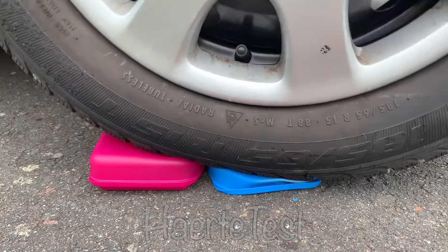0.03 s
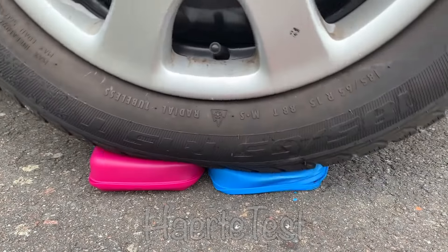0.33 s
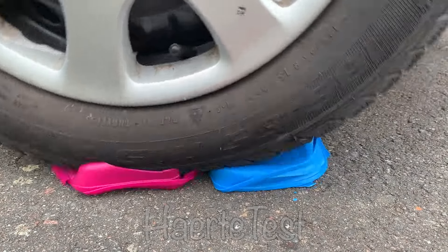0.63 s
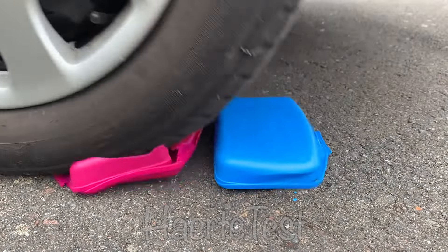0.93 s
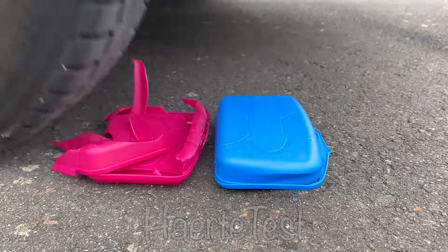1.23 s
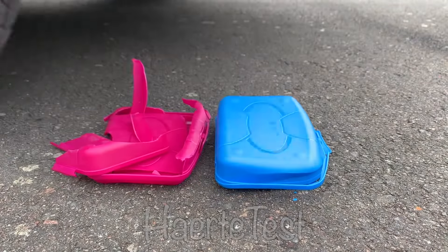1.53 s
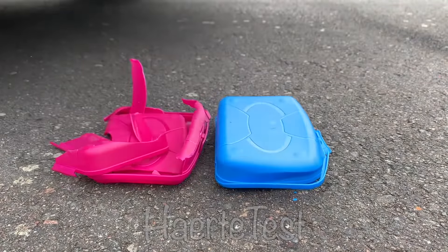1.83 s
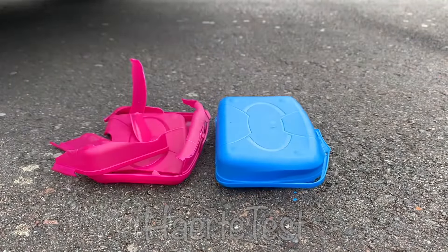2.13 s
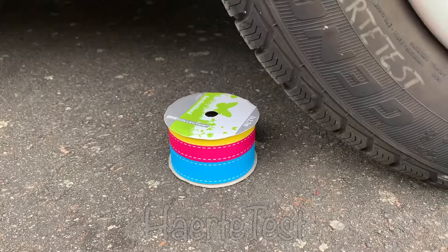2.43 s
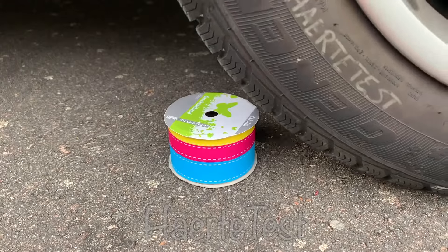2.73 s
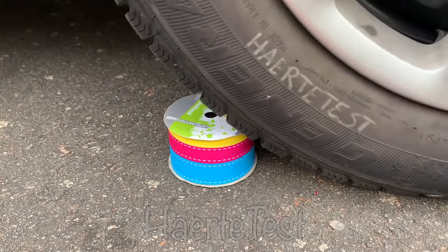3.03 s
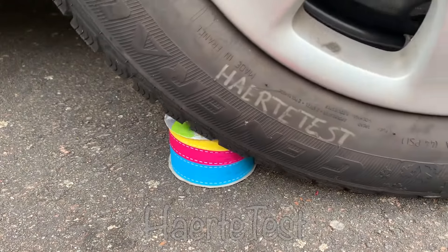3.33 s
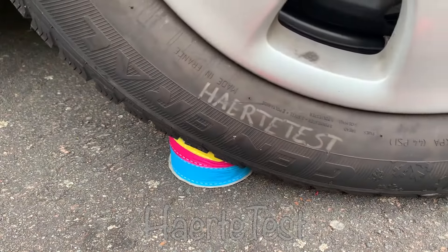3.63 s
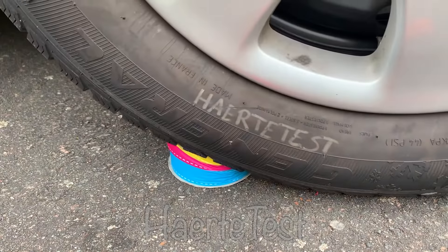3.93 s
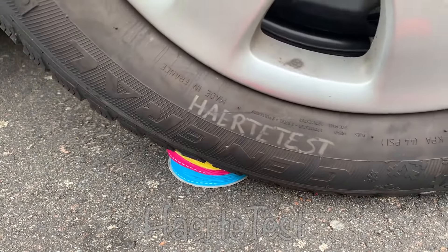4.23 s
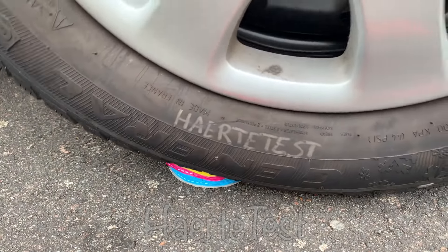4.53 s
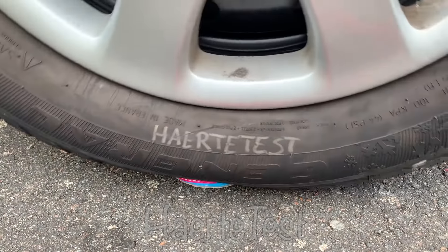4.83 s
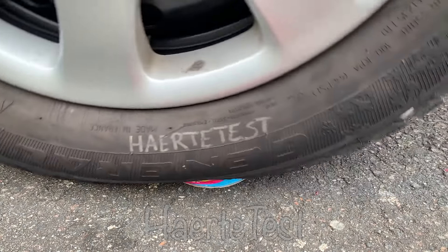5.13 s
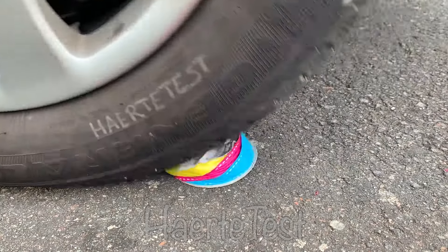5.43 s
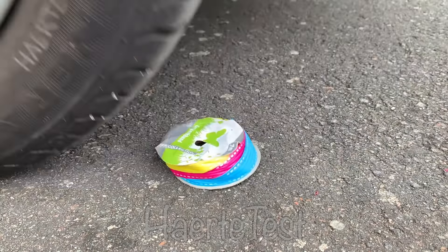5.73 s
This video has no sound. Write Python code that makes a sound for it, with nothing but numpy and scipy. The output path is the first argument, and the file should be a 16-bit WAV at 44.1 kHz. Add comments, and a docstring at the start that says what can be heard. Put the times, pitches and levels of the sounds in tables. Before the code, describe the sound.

A car tyre rolls over plastic boxes with sharp cracks, then slowly crunches a spool over a low engine rumble.

```python
"""Car crushing plastic on asphalt.

A car creeps over two lunch boxes: the shells crack, crunch and spring back over the engine's throb,
with a short echo from the gap between road and underbody. After a cut the car is nearer: its tyre
slowly squashes a ribbon spool and pops grit while the engine labours, then revs to climb over."""
import sys
import numpy as np
from scipy import signal
from scipy.fft import rfft, irfft, next_fast_len
from scipy.io import wavfile
from scipy.ndimage import uniform_filter1d, map_coordinates

SR = 44100
rng = np.random.default_rng(int(sys.argv[2]) if len(sys.argv) > 2 else 0)


def wav_out(sig):
    """Save sig, one row per channel (or a flat mono array), as 16-bit PCM at SR to the path in sys.argv[1]."""
    wavfile.write(sys.argv[1], SR, np.round(np.clip(np.atleast_2d(sig).T, -1, 1) * 32767).astype(np.int16))


N = 259308

# spells of crumpling: (peak time [s], level [dB], rise [s], fall [s])
BOX_CRUSH = [(.47, -64.5, 0.25, 0.13), (.523, -26.5, 0.016, 0.022), (.66, -37.5, 0.045, 0.07),
             (.81, -43.5, .02, 0.1), (.942, -39.5, 0.047, .075), (1.095, -40.5, 0.069, 0.085),
             (1.222, -51.5, 0.053, 0.057)]
SPOOL_CRUSH = [(3.29, -60, 0.52, 0.18), (3.56, -49, .4, 0.35), (4.26, -58, 0.11, 0.17),
               (5.45, -63, 1.4, .4)]
# road grit: (frequency [Hz], density [dB])
GRIT_SPECTRUM = [(1500, -23), (2800, -1.5), (4400, -4), (6100, 4.5), (7200, -4.5), (8400, -1), (10500, -6),
                 (12000, -13), (13500, -7.5), (15500, -25)]


def amp(db):
    """Decibels to gain."""
    return 10 ** (np.asarray(db) / 20)


def unit(x):
    """Scale to rms 1."""
    return x / np.sqrt(np.mean(x ** 2) + 1e-20)


def steady(x):
    """Hold the slow level at rms 1; keep the throb."""
    power = uniform_filter1d(uniform_filter1d(x ** 2, size=SR // 7), size=SR // 10)
    return x / np.sqrt(np.abs(power) + 1e-20)


def along(points, hz):
    """Interpolate (Hz, value) points on a log axis."""
    f, v = np.transpose(points)
    return np.interp(np.log(hz + 1), np.log(f + 1), v)


def curve(points):
    """Interpolate (s, value) points per sample."""
    return np.interp(np.arange(N) / SR, *np.transpose(points))


def fade(t, t60):
    """Decay by 60 dB in t60."""
    return np.exp(-np.log(1000) * t / t60)


def swells(rows):
    """Summed gain; each swell gains 20 dB per rise time, then loses 20 dB per fall time."""
    t = np.arange(N) / SR
    return sum(amp(db - 20 * np.maximum((s - t) / rise, (t - s) / fall)) for s, db, rise, fall in rows)


def wobble(rate_hz):
    """Smooth random curve."""
    knots = rng.standard_normal(int(N * rate_hz / SR) + 4)
    return map_coordinates(knots, [np.arange(N) * rate_hz / SR])


def filtered(x, response):
    """Apply a complex frequency response."""
    size = next_fast_len(N + SR // 2)
    return irfft(rfft(x, size) * response(np.fft.rfftfreq(size, 1 / SR)), size)[..., :N]


def coloured(x, spectrum):
    """Shape by (Hz, dB) points; rms 1."""
    return unit(filtered(x, lambda hz: amp(along(spectrum, hz))))


def resonate(x, modes, soft_hz):
    """Resonances (Hz, width Hz, dB), low-passed at soft_hz."""
    def response(f):
        bank = sum(amp(db) * 1j * f * w / (c * c - f * f + 1j * f * w) for c, w, db in modes)
        return bank / (1 + np.sqrt(2) * 1j * f / soft_hz - (f / soft_hz) ** 2) ** 2
    return filtered(x, response)


def ring(modes, t, shift, blur):
    """Damped modes (Hz, dB, t60 s); bending shifts them, rubbing edges blur them."""
    scatter = rng.standard_normal((len(modes), 2))
    rattle = blur * np.cumsum(rng.standard_normal((len(modes), len(t))), axis=1)
    return sum(amp(db + a) * fade(t, t60) * np.sin(2 * np.pi * hz * (1 + shift * b) * t + phase)
               for (hz, db, t60), (a, b), phase in zip(modes, scatter, rattle))


def stereo(x, lag_ms):
    """Left and right; right is lag_ms later."""
    return filtered(x, lambda hz: np.exp(1j * np.pi * hz * lag_ms / 1000 * np.array([[1], [-1]])))


def rush(spectrum, lag_ms, diffuse, patchy_db):
    """Stereo noise, part direct, part diffuse; its colour shifts in narrow patches."""
    direct = stereo(rng.standard_normal(N), lag_ms)
    pair = np.sqrt(1 - diffuse) * direct + np.sqrt(diffuse) * rng.standard_normal((2, N))
    bins = signal.stft(pair, nperseg=1024)[2]
    patches = uniform_filter1d(rng.standard_normal(bins.shape[1:]), size=3, axis=0)
    patches = unit(uniform_filter1d(patches, size=16, axis=1))
    return coloured(signal.istft(bins * amp(patchy_db * patches), nperseg=1024)[1][:, :N], spectrum)


def echo(x, decay):
    """Diffuse stereo tail with a t60 per frequency."""
    hz, t, bins = signal.stft(rng.standard_normal((2, SR // 2)), SR, nperseg=256)
    tail = signal.istft(bins * fade(t, along(decay, hz)[:, None]), SR, nperseg=256)[1]
    return signal.fftconvolve(x[None], tail / np.linalg.norm(tail[0]), axes=1)[:, :N]


def exhaust_hum(rows, rate_hz, cycles):
    """Under held throttle, the firing harmonic nearest each pitch sings out."""
    fall_s = .14  # per 20 dB
    t = np.arange(N) / SR
    out = np.zeros(N)
    for start, end, hz, db in rows:
        harmonic = np.round(hz / np.interp((start + end) / 2, t, rate_hz))
        outside_s = np.maximum(0, np.maximum(start - t, t - end))
        out += amp(db - 20 * outside_s / fall_s) * np.sqrt(2) * np.cos(2 * np.pi * harmonic * cycles - 1)
    return out * amp(wobble(7))


def engine(speed, load, lug, hum, layers, pipe, bay, first_firing_s, boom_mode, drone_mode,
           pipe_db, puff_db):
    """Each firing kicks the exhaust resonances and lets out a puff; the engine bay whirrs."""
    gas = [(100, -15), (220, -3), (330, -4), (460, -7.5), (580, -3), (850, -7), (1200, -14.5), (3000, -65)]  # exhaust gas: (frequency [Hz], density [dB])
    creep_hz, uneven_db, jitter_cycles = 22.9, 1.6, .013
    rate_hz, load_db = curve(speed), curve(load)
    shake_db, boom_db, drone_db, rasp_db, whirr_db = [
        db + by_speed * (rate_hz - creep_hz) + by_load * load_db for db, by_speed, by_load in layers]
    cycles = np.cumsum(rate_hz) / SR + .01 * wobble(11)  # crankshaft hunts
    cycles -= np.interp(first_firing_s * SR, np.arange(N), cycles)
    at = np.flatnonzero(np.diff(np.floor(cycles)))
    strength, lateness = rng.standard_normal((len(at), 2)).T / rate_hz[at]  # less even when slow
    at = np.clip(at + (jitter_cycles * lateness * SR).astype(int), 0, N - 1)
    firings = np.zeros(N)
    firings[at] = amp(uneven_db * creep_hz * strength)
    flow = unit(firings) + .28 * rng.standard_normal(N)  # pulses plus turbulence

    exhaust = amp(shake_db) * np.sqrt(2) * np.sin(2 * np.pi * cycles)
    boom = steady(resonate(flow, [boom_mode], soft_hz=174))
    exhaust += amp(boom_db + 1.4 * wobble(7)) * (1 + swells(lug)) * boom
    chamber = lambda x: resonate(x, [drone_mode], soft_hz=665)
    exhaust += amp(drone_db) * steady(chamber(chamber(flow)))  # two-chamber silencer
    exhaust += exhaust_hum(hum, rate_hz, cycles)
    overtones = steady(resonate(flow + .72 * rng.standard_normal(N), pipe, soft_hz=820))
    revs_db = .85 * (rate_hz - 28)
    exhaust += amp(rasp_db + pipe_db + revs_db) * overtones

    throb = np.cos(2 * np.pi * cycles - 1)
    puff_gain = amp(rasp_db + puff_db + .2 * throb + .51 * wobble(25))
    puffs = puff_gain * rush(gas, lag_ms=.33, diffuse=.39, patchy_db=3.5)
    whirr_gain = amp(whirr_db + .98 * throb + 1.3 * wobble(60))
    whirr = whirr_gain * rush(bay, lag_ms=.335, diffuse=.69, patchy_db=2.2)
    return stereo(exhaust, lag_ms=-.54) + puffs + whirr


def far_engine():
    """The engine creeps over the boxes."""
    speed = [(0, 18.89), (.43, 23.35), (.729, 27.79), (1.271, 27.4), (1.573, 28.68), (2.49, 28.23)]  # (time [s], firing rate [Hz])
    load = [(0, 6), (.62, -3), (0.799, 3), (1.3, -2), (1.9, -4), (2.151, -6), (2.491, -8.5)]  # (time [s], load [dB])
    lug = [(.8, -6.5, .06, 0.21)]  # added boom: (peak time [s], level [dB], rise [s], fall [s])
    hum = [(0, 0.417, 84, -48), (0, 0.171, 158, -50), (0.35, .5, 161, -49), (.72, 1.302, 138, -47),
           (.8, 1.555, 166, -50.5), (1.4, 2.002, 142, -56.5)]  # exhaust tones: (start [s], end [s], rough pitch [Hz], level [dB])
    # shake, boom, drone, rasp, whirr: (creep level [dB], by speed [dB/Hz], by load [dB/dB])
    layers = [(-54, 0.34, -1.1), (-49, 0.74, 0.13), (-50.5, 1.3, 0.76), (-56, 0.2, 0.28),
              (-68.5, 1.12, 0.9)]
    pipe = [(292, 69, -1.5), (513, 45, -15)]  # upper exhaust modes: (centre [Hz], width [Hz], level [dB])
    bay = [(450, -28), (700, 2), (1000, -1), (1500, -2), (2600, .5), (3300, -5), (4400, -11), (7000, -19),
           (8300, -15), (10000, -27), (12000, -42)]  # belts, fan, valves: (frequency [Hz], density [dB])
    return engine(speed, load, lug, hum, layers, pipe, bay, first_firing_s=.024,
                  boom_mode=(69, 14, 0), drone_mode=(155.1, 50, 0), pipe_db=2.5, puff_db=-3.5)


def near_engine():
    """The engine labours at the spool, then revs over it."""
    speed = [(2.49, 21.17), (2.7, 21.51), (2.88, 22.73), (3.2, 25.58), (3.5, 25.48), (3.72, 24.38),
             (4.1, 22.78), (4.28, 19.82), (4.55, 19.39), (4.8, 26.21), (5.05, 35.4), (5.26, 37.1),
             (5.56, 40.7), (5.66, 38.8), (5.88, 38.9)]  # (time [s], firing rate [Hz])
    load = [(2.49, -3), (3.05, -1), (4.2, -3), (4.6, 6), (5.55, 6.5), (5.681, -4.5), (5.88, -1.5)]  # (time [s], load [dB])
    lug = [(3.64, -0.5, 0.084, .06), (4.93, 9, 0.56, 0.13)]  # added boom: (peak time [s], level [dB], rise [s], fall [s])
    hum = [(2.59, 2.85, 86, -34), (2.98, 3.07, 165, -30), (2.94, 3.62, 76, -39.5), (3.09, 3.62, 153, -36.5),
           (3.09, 3.1, 127, -30.5), (2.4, 3.03, 134, -38), (3.66, 4.1, 165, -32), (3.95, 4.3, 88, -35.5),
           (4.3, 4.55, 78, -41), (4.28, 4.6, 157, -37), (5.1, 4.8, 33, -29), (4.94, 5.08, 66, -29),
           (4.99, 5.26, 147, -24.5), (4.93, 5.38, 183, -26.5), (5.5, 5.6, 160, -23.5),
           (5.35, 5.6, 278, -40.5), (5.4, 5.88, 78, -39)]  # exhaust tones: (start [s], end [s], rough pitch [Hz], level [dB])
    # shake, boom, drone, rasp, whirr: (creep level [dB], by speed [dB/Hz], by load [dB/dB])
    layers = [(-43, 0.94, -0.68), (-34, 0.0066, .25), (-31.5, 0.022, 0.76), (-38.5, 0.12, 0.45),
              (-47.5, 0.013, 0.52)]
    pipe = [(285.5, 17, 4.9), (346.4, 12, 1.6), (396.7, 14, 2.4), (551.6, 21, 6.3)]  # upper exhaust modes: (centre [Hz], width [Hz], level [dB])
    bay = [(500, -8.5), (950, -0.5), (1800, -1), (3200, -6), (4300, -12), (5400, -19), (7300, -21),
           (8200, -15), (9200, -27.5), (10800, -20), (11800, -83), (15000, -50)]  # belts, fan, valves: (frequency [Hz], density [dB])
    return engine(speed, load, lug, hum, layers, pipe, bay, first_firing_s=2.503,
                  boom_mode=(79, 27.6, 0), drone_mode=(158.8, 36.5, 0), pipe_db=-10.5, puff_db=-2)


def drive_whine():
    """The loaded drive gives a narrow, unsteady tone that swells twice."""
    spells = [(5.33, -57, 0.17, 0.54), (5.73, -39, 0.43, 0.53)]  # (peak time [s], level [dB], rise [s], fall [s])
    tone = resonate(rng.standard_normal(N), [(526, 6.3, 0)], soft_hz=900)
    return stereo(swells(spells) * steady(tone), lag_ms=.16)


def tyre_roll():
    """The carcass rumbles onto the spool and down to the road."""
    spells = [(3.36, -42, 0.38, 0.29), (4.48, -50.5, 0.1, 0.3), (5.42, -35.5, 0.49, 0.23),
              (5.85, -38.5, .25, 0.34)]  # (peak time [s], level [dB], rise [s], fall [s])
    carcass = [(150, -21.5), (260, 5.5), (400, 2.5), (600, -8.5), (1200, -30), (3000, -73)]  # (frequency [Hz], density [dB])
    return swells(spells) * amp(4.1 * wobble(30)) * rush(carcass, lag_ms=.37, diffuse=.34, patchy_db=-.5)


def tyre_scrub():
    """The tread sticks and slips on the spool with a faint squeal."""
    spells = [(3.5, -46, 0.14, 0.047), (3.69, -51, 0.11, 0.11), (4.43, -55, 0.2, 0.15),
              (5.29, -37.5, 0.37, 0.52)]  # (peak time [s], level [dB], rise [s], fall [s])
    rubber_modes = [(1177, 35, 2), (1669, 18, 1), (1950, 1200, -11.5)]  # (centre [Hz], width [Hz], level [dB])
    slips = rng.standard_normal((2, N)) * amp(.95 * wobble(27))
    return swells(spells) * unit(resonate(slips, rubber_modes, soft_hz=4070))


def grit_pops():
    """Small stones tick under the tread."""
    pops = [(3.1568, -38), (3.169, -35), (3.1758, -25), (3.223, -35), (3.2633, -33.5), (3.348, -34),
            (3.5062, -43), (3.66, -46), (3.687, -39), (4.4748, -41), (4.8559, -39), (5.1804, -38.5),
            (5.36, -44), (5.5222, -35.5)]  # (time [s], level [dB])
    t = np.arange(SR // 20) / SR
    bursts = np.zeros(N + SR)
    for s, db in pops:
        bursts[round(s * SR):][:len(t)] += amp(db - 5) * fade(t, t60=.018)
    return bursts[:N] * rush(GRIT_SPECTRUM, lag_ms=.064, diffuse=1, patchy_db=3)


def creases(rate_hz, clump_db):
    """Tiny creases give way in clumps, a few much louder than the rest."""
    sizes = amp(6 * np.clip(rng.standard_normal(N), -2, 2))
    impulses = (rng.random(N) < rate_hz / SR) * rng.choice([-1, 1], N)
    return impulses * sizes * amp(clump_db * wobble(70))


def crumple(crush, spectrum, rate_hz, clump_db):
    """A rustle of creases follows the crushing."""
    return swells(crush) * coloured(creases(rate_hz, clump_db), spectrum)


def box_rustle():
    """The boxes crumple and grind on road grit."""
    spectrum = [(200, -13), (600, -0.5), (1100, 0.5), (1900, 1), (3200, -7.5), (4800, -7.5), (6500, -16.5),
                (9000, -20), (11000, -30), (15000, -37)]  # (frequency [Hz], density [dB])
    grinding = [(.46, -69, .26, .2), (1.096, -49, 0.033, 0.021), (1.133, -53.5, 0.02, 0.055)]  # (peak time [s], level [dB], rise [s], fall [s])
    walls = crumple(BOX_CRUSH, spectrum, rate_hz=2000, clump_db=3.5)
    return walls + crumple(grinding, GRIT_SPECTRUM, rate_hz=2100, clump_db=2.5)


def spool_rustle():
    """The spool and its ribbon give way."""
    spectrum = [(300, -2), (1000, 1), (1900, 4), (3500, -4.5), (6000, 0.5), (8300, 1.5), (11000, -4.5),
                (13700, -7), (15000, -36)]  # (frequency [Hz], density [dB])
    return stereo(crumple(SPOOL_CRUSH, spectrum, rate_hz=6700, clump_db=1.5), lag_ms=.212)


def flange_crunches():
    """Quick runs of creases ring a buckling spool flange."""
    buckles = [(3.428, -45.5, 0.028, .03, 2250), (3.505, -43.5, 0.062, .03, 1790),
               (3.585, -46.5, 0.032, 0.027, 2450), (3.685, -44, 0.086, 0.08, 1450),
               (4.43, -48.5, 0.055, 0.11, 1370)]  # (peak time [s], level [dB], rise [s], fall [s], pitch [Hz])
    run = creases(rate_hz=2800, clump_db=-2)
    return sum(swells([swell]) * unit(signal.lfilter(*signal.iirpeak(hz, Q=2.5, fs=SR), run))
               for *swell, hz in buckles)


def thuds():
    """A wall or flange caves in or springs back and rings the hollow."""
    knocks = [(0.513, -30, 560, .04), (0.525, -11.5, 263, 0.043), (0.529, -20, 490, 0.039),
              (0.544, -31.5, 567, .06), (0.56, -30.5, 238, .06), (0.562, -28.5, 107, 0.16),
              (0.6167, -44, 560, .03), (0.643, -43, 301.3, 0.036), (0.685, -21.5, 280, 0.087),
              (0.707, -26.5, 165, .1), (0.803, -24.5, 361, 0.073), (0.808, -29, 112, 0.13),
              (0.835, -33, 245, 0.089), (0.838, -37, 478, .09), (0.941, -31.5, 690, 0.072),
              (0.946, -32.5, 331, 0.08), (1.094, -44, 730, 0.032), (3.086, -30.5, 390, 0.057),
              (3.298, -24, 450, 0.025), (3.337, -19, 410, 0.035), (3.394, -24, 324, 0.042),
              (3.602, -32, 330, 0.035), (3.619, -14.5, 224, 0.049), (3.637, -32, 606, 0.055),
              (4.475, -29, 289, 0.08)]  # (time [s], level [dB], pitch [Hz], t60 [s])
    hollow_modes = [(.78, -9, .8), (1, 0, 1), (1.3, -8, .8), (1.9, -9, .7), (2.4, -10, .6)]  # (pitch ratio, level [dB], t60 ratio)
    t = np.arange(SR // 4) / SR
    attack = 1 - np.exp(-t / .001)
    out = np.zeros(N + SR)
    for s, db, pitch_hz, t60 in knocks:
        modes = [(pitch_hz * ratio, level, t60 * share) for ratio, level, share in hollow_modes]
        out[round(s * SR):][:len(t)] += amp(db) * attack * ring(modes, t, shift=.013, blur=.035)
    return filtered(out[:N], lambda hz: (1j * hz / (1j * hz + 60)) ** 2)


def lesser_cracks(crush, count, splinter_db):
    """Random rows for snaps(), likelier and louder under harder crushing."""
    above_db, scatter_db, pitch_hz, scatter_oct = 6, 2.5, 2020, .5
    effort = swells(crush)
    odds = np.cumsum(np.sqrt(effort))
    at = np.searchsorted(odds / odds[-1], (np.arange(count) + rng.random(count)) / count)
    return [(i / SR, 20 * np.log10(effort[i]) + above_db + scatter_db * a,
             pitch_hz * 2 ** (scatter_oct * b), splinter_db)
            for i, (a, b) in zip(at, rng.standard_normal((count, 2)))]


def snaps():
    """Each crack sends a pressure pulse, tears fibres with a hiss and rings the bent shell."""
    cracks = [(0.403, -33.5, 1424, -11), (0.523, -7.5, 2500, 3), (0.5258, -7, 1350, -20),
              (0.5278, -8, 2050, -3.5), (0.529, -6, 840, -16), (0.586, -36.5, 1880, -22),
              (0.6173, -23.5, 1400, -32), (.642, -15, 1560, -28), (0.645, -23, 1520, -9),
              (0.6585, -19, 1320, -20), (0.681, -9, 1710, 6), (0.6856, -5.5, 1476, -2.5),
              (0.7595, -29.5, 3900, -26), (0.7982, -8, 1423, -4.5), (0.803, -18, 1120, -20),
              (0.893, -39.5, 1400, -12), (0.9207, -28.5, 1700, -26), (0.9306, -18.5, 2530, -24),
              (.942, -20, 1360, -13), (.947, -39, 900, -12), (0.9547, -17, 2400, -6),
              (0.989, -25.5, 1800, -28), (1.0197, -34, 1990, -10), (1.0372, -23, 2080, -17),
              (1.0606, -18, 2410, -17), (1.0795, -24, 1920, -15.5), (1.091, -24, 1750, -14),
              (1.095, -23, 1190, -8), (1.107, -20.5, 2014, -19), (1.1305, -25, 1740, 4),
              (1.2961, -30.5, 1880, -24), (3.381, -26, 2730, -22), (3.392, -26, 1200, -18),
              (3.623, -27, 2200, -5), (4.8548, -24, 3874, -24), (5.579, -26, 2700, -15)]  # (time [s], level [dB], shell pitch [Hz], splinter level [dB])
    shell_modes = [(.45, -10, .016), (.76, -1.5, 0.013), (1, 2, 0.014), (1.3, -1, 0.008), (1.8, -10, 0.007),
                   (2.9, -14, 0.005)]  # (pitch ratio, level [dB], t60 of a 0 dB crack [s])
    fibres = [(300, -41.5), (1500, -3), (3000, 7.5), (4200, 5), (6300, 7), (7300, 0), (10500, 0),
              (11800, -13.5), (13500, -3.5), (15500, -20)]  # tearing: (frequency [Hz], density [dB])
    lesser = lesser_cracks(BOX_CRUSH, count=7, splinter_db=-8)
    lesser += lesser_cracks(SPOOL_CRUSH, count=20, splinter_db=-12)
    pulse_s, opening_s = .00008, .00019
    t = np.arange(SR // 10) / SR
    pulse = amp(-4.5) * (1 - t / pulse_s) * np.exp(-t / pulse_s)
    pulse = np.convolve(pulse, np.hanning(7) / 3)[:len(t)]
    opening = 1 - np.exp(-t / opening_s)
    out = np.zeros(N + SR)
    hiss = np.resize(coloured(rng.standard_normal(N), fibres), len(out))
    for s, db, pitch_hz, splinter_db in cracks + lesser:
        span = slice(round(s * SR), round(s * SR) + len(t))
        size = 2 ** (db / 34)  # louder cracks free larger pieces that ring longer
        modes = [(pitch_hz * ratio, level, t60 * size) for ratio, level, t60 in shell_modes]
        shell = ring(modes, t, shift=.063, blur=.19)
        tear = hiss[span] * (fade(t, .007 * size) + amp(-23) * fade(t, .045 * size))
        out[span] += amp(db) * (opening * (.49 * shell + .66 * amp(splinter_db) * tear) + pulse)
    return filtered(out[:N], lambda hz: (1j * hz / (1j * hz + 170)) ** 2)  # small shells: no deep bass


def scene():
    """Plastic and its echoes over the engine, first far, then near."""
    # echo decay: (frequency [Hz], t60 [s])
    tyre_wall = [(200, 0.032), (12000, 0.006)]
    underbody = [(200, .11), (1000, 0.065), (4000, 0.055), (12000, 0.03)]
    street = [(200, 0.63), (2000, 0.13), (10000, 0.1)]
    cut_s, crossfade_s = 2.494, .00089
    far, near = far_engine(), near_engine()
    plastic = snaps() + flange_crunches() + box_rustle()
    mix = stereo(plastic, lag_ms=.11)
    for decay, db in (tyre_wall, -4), (underbody, -7), (street, -30.5):
        mix += amp(db) * echo(plastic, decay)
    knocks = thuds()
    mix += stereo(knocks, lag_ms=.24) + amp(-12.5) * echo(knocks, underbody)
    near += spool_rustle() + grit_pops() + tyre_roll() + tyre_scrub() + drive_whine()
    after_cut = np.clip((np.arange(N) / SR - cut_s) / crossfade_s, 0, 1)
    return mix + (1 - after_cut) * far + after_cut * near


def record(dry):
    """Colour left and right, saturate the loudest cracks, limit the band."""
    balance = [(60, -3), (200, 0.5), (380, -1.5), (700, 3), (1400, 2), (4400, 0.5), (8100, -5),
               (14000, 2.5)]  # (frequency [Hz], left minus right [dB])
    ceiling, top_hz = .85, 15900
    tinted = filtered(dry, lambda hz: amp(along(balance, hz) * np.array([[.5], [-.5]])))
    saturated = tinted / (1 + np.abs(tinted / ceiling) ** 4) ** .25
    return filtered(saturated, lambda hz: 1 / (1 + (hz / top_hz) ** 120))


dry = scene()
out = record(dry)
wav_out(out)
```